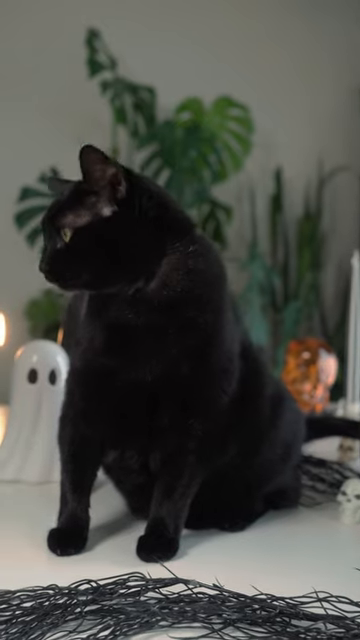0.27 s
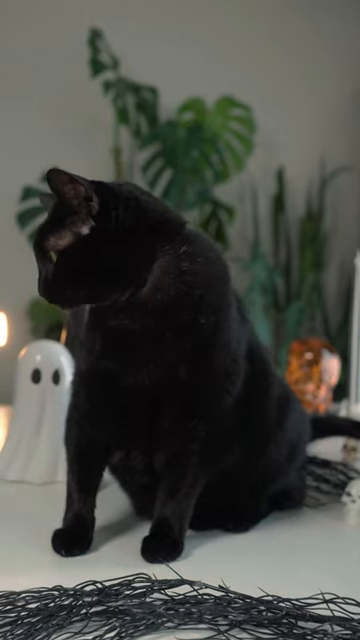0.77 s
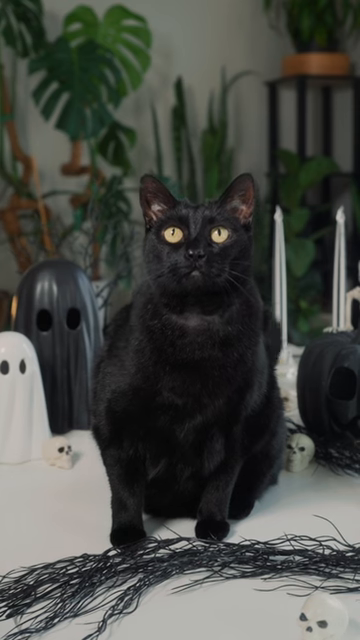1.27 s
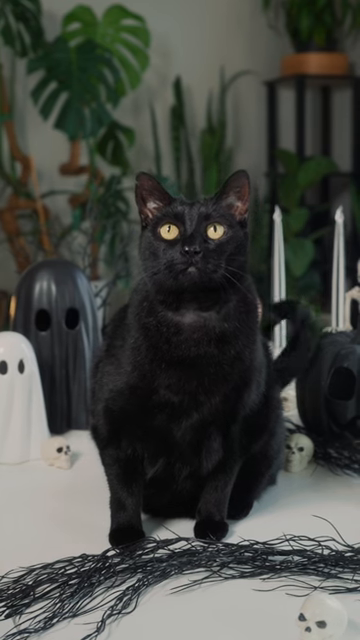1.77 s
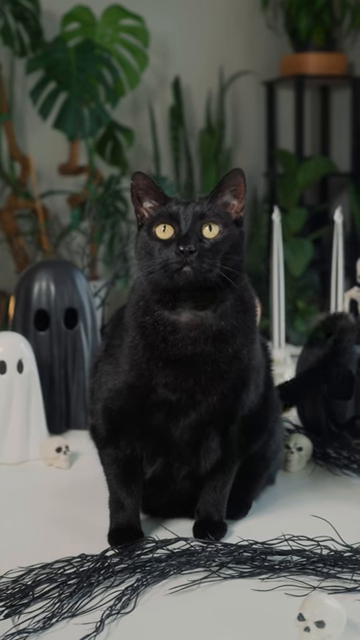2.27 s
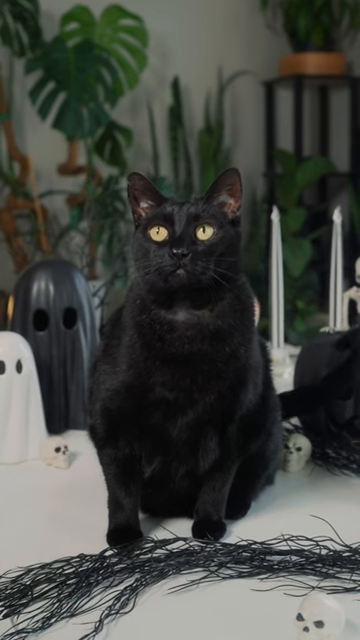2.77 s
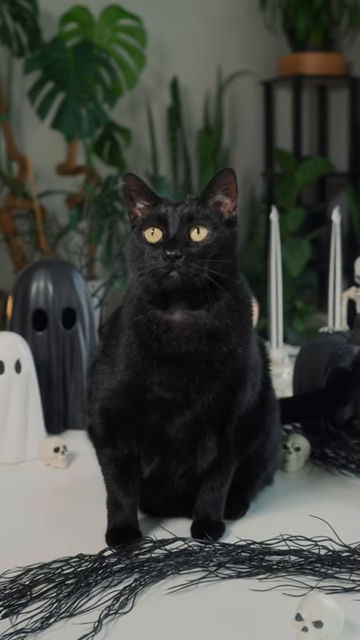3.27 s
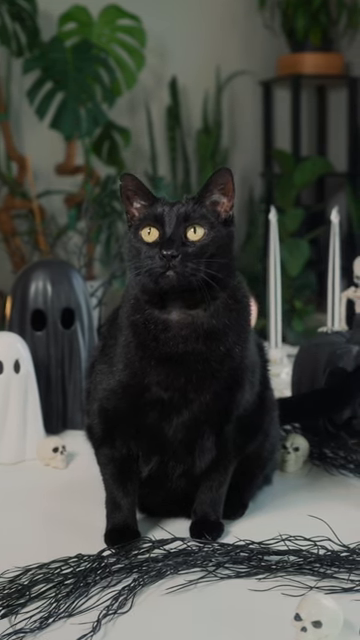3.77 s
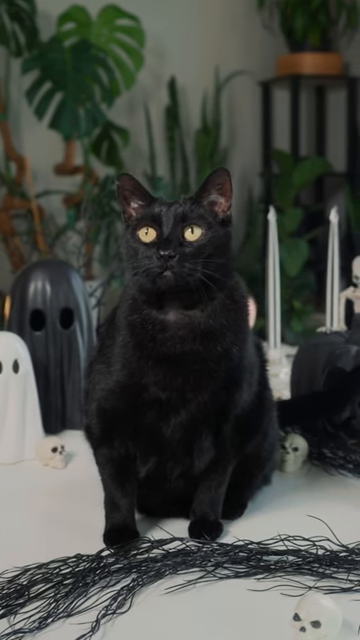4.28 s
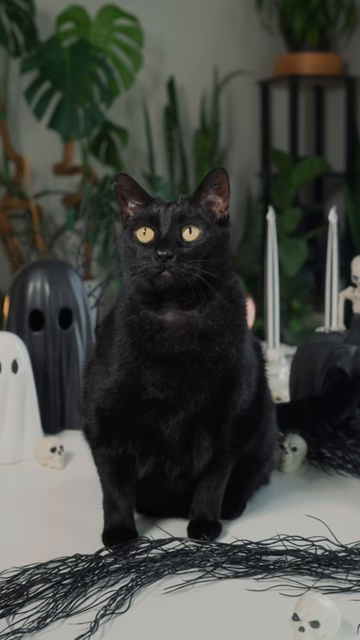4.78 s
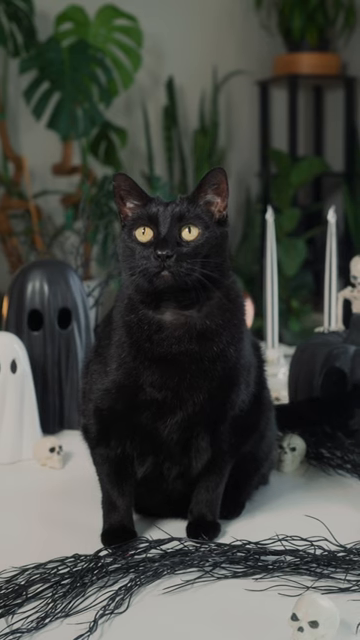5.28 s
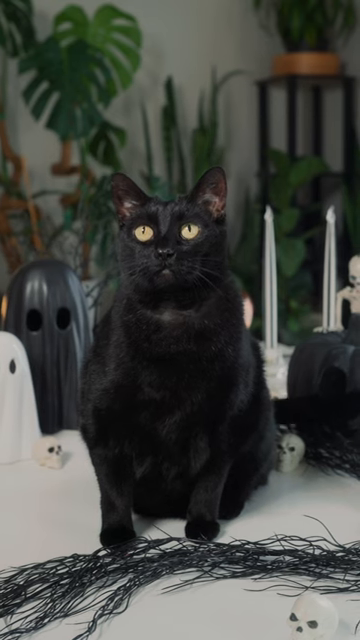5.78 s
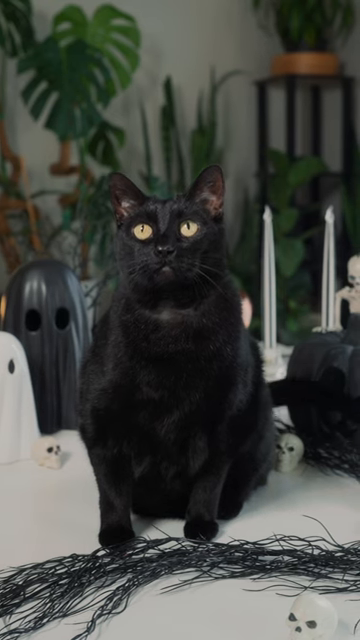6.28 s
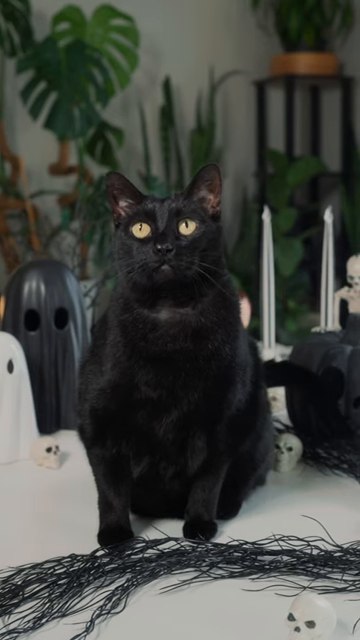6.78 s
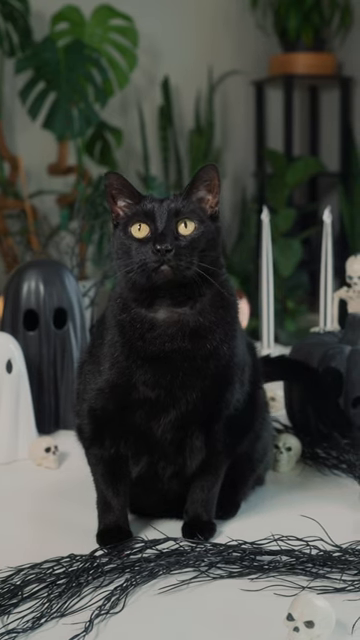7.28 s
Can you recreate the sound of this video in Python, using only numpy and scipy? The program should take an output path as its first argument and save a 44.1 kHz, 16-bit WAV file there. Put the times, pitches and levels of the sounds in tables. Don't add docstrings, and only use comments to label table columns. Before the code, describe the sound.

A sitting cat purrs with the microphone touching its fur, in a quiet room. About 26 low throbs a second, each with a soft knock, a small wet tick and a puff of air. The rumble swells and dips as breath turns every half second, out-breaths and in-breaths differing in colour. Around the third second the fur bumps the microphone with a very deep wobble.

```python
import sys
import numpy as np
from scipy import signal
from scipy.fft import rfft, irfft
from scipy.io import wavfile
from scipy.ndimage import uniform_filter1d

SR = 44100
rng = np.random.default_rng(int(sys.argv[2]) if len(sys.argv) > 2 else 0)


def waveform_to_disk(signal):
    frames = np.transpose(np.atleast_2d(signal))
    scaled = np.clip(frames, -1, 1) * 32767
    samples = np.round(scaled).astype(np.int16)
    wavfile.write(sys.argv[1], SR, samples)


def makeup_ratio(level_db):
    decades = np.asarray(level_db, float) / 20
    return 10 ** decades


N = 332514
T = np.arange(N) / SR
PERIOD_MS = 38.5
CHIN_DROPS_S = 2.05


def set_rms(x, db):
    return x * makeup_ratio(db) / np.sqrt(np.mean(x ** 2))


def bump(ms, rise, fall, roundness=2):
    side = np.where(ms < 0, rise, fall)
    return np.exp(-.5 * np.abs(ms / side) ** roundness)


def clicks(s, size):
    out = np.zeros(N)
    at = np.clip((s * SR).astype(int), 0, N - 1)
    np.add.at(out, at, size)
    return out


def fade(x, ms):
    return signal.lfilter([1], [1, -np.exp(-1000 / (ms * SR))], x)


def band(x, lo_hz, hi_hz):
    return signal.sosfilt(signal.butter(2, (lo_hz, hi_hz), "band", fs=SR, output="sos"), x)


def ring(x, modes):
    total = 0
    for hz, width, db in modes:
        b, a = signal.iirpeak(hz, hz / width, SR)
        total = total + makeup_ratio(db) * signal.lfilter(b, a, signal.lfilter(b, a, x))
    return total


# f/Hz, spectral level/dB
ROOM_SPECTRUM = [(400, -14), (1500, 0), (2600, -6), (8000, -7), (11000, -4.5), (14000, 1), (15800, 2),
                 (16200, -30)]


def room_noise():
    hz, db = np.transpose(ROOM_SPECTRUM)
    bin_hz = np.arange(N // 2 + 1) * SR / N
    colour = makeup_ratio(np.interp(np.log(bin_hz + 1), np.log(hz), db))
    return set_rms(irfft(rfft(rng.standard_normal(N)) * colour, N), -86)


# first twitch t/s, twitches, first gap/ms,
# gap change per twitch/ms
STROKES = [(0.0167, 3, 38.13, 0.0), (0.1312, 12, 38.13, -0.117), (0.5819, 13, 39.55, 0.051),
           (1.0929, 11, 39.3, -0.207), (1.516, 14, 41.92, -0.259), (2.0748, 12, 37.18, -0.006),
           (2.5249, 14, 39.6, 0.022), (3.0765, 11, 37.3, -0.071), (3.4851, 13, 39.82, -0.138),
           (3.9863, 15, 37.38, -0.073), (4.5452, 13, 40.44, -0.172), (5.0505, 12, 37.31, -0.051),
           (5.4992, 14, 40.08, -0.064), (6.0506, 13, 39.46, -0.139), (6.5581, 17, 41.26, -0.081),
           (7.2426, 8, 37.88, -0.016)]


def twitch_times():
    trains = []
    for start, twitches, gap, change in STROKES:
        n = np.arange(twitches)
        trains.append(start + (gap * n + change * n ** 2 / 2) / 1000)
    return np.concatenate(trains)


# out-breath start t/s, in-breath start t/s, larynx slackness (0-1)
BREATHS = [
    (.12, .577, 0),
    (1.066, 1.511, 0),
    (2.06, 2.505, .2),
    (3.05, 3.478, 0),
    (3.96, 4.53, .1),
    (5.03, 5.48, 1),
    (6.05, 6.548, 1),
    (7.23, 8, 1),
]


def breath():
    out, slack = np.zeros(N), np.zeros(N)
    for start, end, loose in BREATHS:
        out[int(start * SR):int(end * SR)] = 1
        slack[int(start * SR):] = loose
    return uniform_filter1d(out, size=700), slack


def place(s):
    turns = np.append(0, np.array(BREATHS)[:, :2])
    k = np.clip(np.searchsorted(turns, s, "right") - 1, 0, len(STROKES) - 1)
    since, until = s - turns[k], turns[k + 1] - s
    return k, since, until, since / (since + until)


def arc(s, rule):
    k, since, until, done = place(s)
    db, sag, start, recover, end, onset = np.array(rule)[1 - k % 2].T
    return db + sag * done + start * np.exp(-since / recover) + end * np.exp(-until / onset)


# level at the turn/dB, swelling to/dB, sag by the end/dB, turbulence/dB
FLOW = [(-11, -16, -4, -64), (-25.5, -8.5, -3, -45), (-13.5, -7.5, -5, -43.5), (-22, -8, -2.5, -43.5),
        (-14.5, -8, -7.5, -43), (-26, -12, -8.5, -51), (-24.5, -15, -10.5, -45), (-32.5, -25, 26, -45),
        (-7, -2.5, -9, -39), (-20, -9, -2, -43.5), (-14.5, -7, -13.5, -44.5), (-29.5, -7, -9, -50.5),
        (-23.5, -15.5, -7.5, -49), (-32.5, -11, -5.5, -52.5), (-23, -17.5, -8, -51),
        (-30.5, -12.5, -3, -51.5)]


def flow_db(s):
    k, since, until, done = place(s + .01)
    turn, top, sag, _ = np.transpose(FLOW)
    swell_s, ebb_s = np.where(k % 2, .058, .091), np.where(k % 2, .045, .061)
    to_next = np.roll(turn, -1) - top - sag
    swell = (turn - top)[k] * np.exp(-since / swell_s)
    ebb = to_next[k] * np.exp(-until / ebb_s)
    return top[k] + sag[k] * done + swell + ebb


def twitch(ms, drift, lead, rise, fall, roundness, brace, closure, edge, hold, recoil, lag, width):
    surge_drift, shut_drift, lag_drift, recoil_drift, _ = drift
    wave = 0
    for v in (ms - PERIOD_MS, ms, ms + PERIOD_MS):
        surge = bump(v + lead + surge_drift, rise, fall, roundness)
        surge -= brace * bump(v + lead + 6 + 1.1 * surge_drift, 1.67, 1.37)
        front = .5 + .5 * np.tanh(v / edge / 2)
        shut = front * bump(np.maximum(v, 0), hold, hold) * makeup_ratio(3.1 * shut_drift)
        back = bump(v - lag + 1.1 * lag_drift, width, width, roundness) * makeup_ratio(1.3 * recoil_drift)
        wave = wave + surge + closure * shut - recoil * back
    return set_rms(wave - wave.mean(), 0)


# surge lead/ms, rise/ms, fall/ms,
# roundness, bracing share, closure share, edge/ms, hold/ms, recoil share, lag/ms, width/ms
TWITCH_OUT_TIGHT = (10.8, 3.3, 2.4, 1.785, 0.022, 0.37, 0.76, 3.2, 0.55, 9.7, 3.42)
TWITCH_OUT_SLACK = (9.5, 3, 3.73, 1.94, 0.24, 0.31, 0.42, 7.2, 1.13, 16.9, 8.95)
TWITCH_IN = (11.49, 1.88, 4.55, 2.13, 0.23, 0.38, 0.46, 3, 0.19, 11.1, 2.8)


def airflow(count, ms, out, slack):
    steps = rng.standard_normal((200, 5)).T
    drift = [np.interp(count, np.arange(200) - 1.5, c) for c in steps]
    tight = twitch(ms, drift, *TWITCH_OUT_TIGHT)
    loose = twitch(ms, drift, *TWITCH_OUT_SLACK)
    outward = (1 - slack) * tight + slack * loose
    inward = -twitch(ms, drift, *TWITCH_IN)
    return makeup_ratio(flow_db(T) + 0.9 * drift[4]) * (out * outward + (1 - out) * inward)


# peak level/dB, sag by the end/dB, crispness/dB
SLAPS = [(-21, -2.5, -16), (-27, 0.5, -15.5), (-27, 1, -12), (-27.5, 3.5, -15.5), (-24, -7, -11),
         (-23.5, -4.5, -13), (-33, 2.5, -12), (-23.5, 14, -19.5), (-17.5, -6, -18.5), (-14, -2.5, -20),
         (-21, -7.5, -15.5), (-21, -1.5, -16.5), (-27, -4.5, -15.5), (-20.5, -2.5, -18),
         (-26.5, -7.5, -14.5), (-23.5, 1, -17.5)]
# t/s, level/dB
ODD_SLAPS = [(.207, 5.5), (.582, 2.5), (.779, 3.5), (1.06, 10.5), (1.724, 4.5), (2.186, 4.5), (2.297, -9),
             (2.334, -10), (2.604, 6), (2.645, 10.5), (3.114, 2), (3.261, -6), (3.371, -9.5), (3.444, -10),
             (3.485, 4.5), (4.023, 6), (4.506, -3.5), (4.247, -2), (5.459, -9), (5.699, 3.5), (6.016, 2),
             (6.053, 2), (6.245, -12.5), (6.515, -18), (6.8, 3), (7.356, 4.5)]
# offset/dB, sag/dB, dip at start/dB, recovery/s,
# dip at end/dB, onset/s
SLAP_ARC = (0, 0.5, -29, 0.041, -41, 0.021), (0, 1, -6.5, 0.095, -23, 0.036)
CRISP_ARC = (0, -3, -2.5, 0.059, 0, .05), (0, -11, -4, .05, 0.0082, .05)


def slap_db(s):
    k, _, _, done = place(s)
    peak, sag, crisp = np.array(SLAPS)[k].T
    odd = sum(db * (np.abs(s - at) < PERIOD_MS / 2000) for at, db in ODD_SLAPS)
    return peak + sag * done + arc(s, SLAP_ARC) + odd, crisp + arc(s, CRISP_ARC)


def thud():
    impulse = band(clicks(np.zeros(1), 1), 190, 560)[:900]
    knock = signal.sosfilt(signal.butter(8, 880, fs=SR, output="sos"), impulse)
    return knock / np.abs(knock).max()


# t/s, peak level/dB, crispness/dB
DOUBLES = [(0.683, -38.5, -6), (1.607, -29, -12.5), (2.158, -28.5, -18), (3.173, -27, -19),
           (3.546, -16.5, -25.5), (3.574, -21, -21.5), (3.647, -24, -25.5), (4.044, -15, -24),
           (4.607, -20, -21.5), (4.639, -28, -19), (4.758, -32.5, -19.5), (5.108, -19.5, -29),
           (6.148, -50, -31), (6.661, -26, -20.5), (6.7, -30, -17), (7.403, -35, -13)]
# f/Hz, width/Hz, level/dB
NOSE = [(3260, 1240, 3), (5250, 2100, 4.5), (7480, 1600, 1), (12100, 1100, -13.5), (13600, 7900, -11.5)]
NOSE_RAISED = [(2870, 690, 4.5), (4280, 460, 1), (4860, 1100, 5.5), (7800, 960, 0), (11900, 1300, -7),
               (14000, 2300, -9)]


def slaps(count, out):
    s = np.interp(np.arange(195), count, T)
    chance = rng.standard_normal((195, 4)).T
    way = np.interp(s, T, 2 * out - 1)
    peak_db, crisp_db = slap_db(s)
    peak_db = peak_db + 1.1 * chance[0]
    s2, peak2_db, crisp2_db = np.transpose(DOUBLES)
    way2 = np.interp(s2, T, 2 * out - 1)
    knock = fade(clicks(s, way * makeup_ratio(peak_db)), 0.67) + fade(clicks(s2, way2 * makeup_ratio(peak2_db)), 1.0)

    early = s - .0145 + .0007 * way + .0007 * chance[1]
    parting_db = flow_db(s) * 4 / 5 + np.where(way > 0, -23, -17) + 2 * chance[3]
    parting = np.convolve(clicks(early, way * makeup_ratio(parting_db)), thud())[:N]

    tick = clicks(s, makeup_ratio(peak_db + crisp_db + 1.3 * chance[2]))
    tick = tick + clicks(s2, makeup_ratio(peak2_db + crisp2_db + 2))
    spray = fade(tick, .6) * rng.standard_normal(N)
    edge = tick + .12 * spray
    nose = np.where(T < CHIN_DROPS_S, ring(edge, NOSE_RAISED), ring(edge, NOSE))
    return makeup_ratio(5.5) * knock, parting + makeup_ratio(14.5) * nose


def tract(x, modes):
    filters = []
    for hz, width in modes:
        roots = np.exp(np.pi * np.array([2j * hz - width, -2j * hz - width]) / SR)
        filters.append(np.real(np.poly(roots)))
    *poles, notch = filters
    x = signal.lfilter(notch / notch.sum(), [1], np.pad(x, (500, 0), "edge"))
    for pole in poles:
        x = signal.lfilter([pole.sum()], pole, x)
    return x[500:]


# f/Hz, width/Hz
THROAT = [(804, 302), (1113, 440), (1160, 6300), (1500, 3200), (1034.6, 115)]
THROAT_RAISED = [(784, 343), (1185, 720), (1660, 1700), (1960, 4500), (977, 140)]


def throat(x):
    return np.where(T < CHIN_DROPS_S, tract(x, THROAT_RAISED), tract(x, THROAT))


# offset/dB, sag/dB,
# dip at start/dB, recovery/s, dip at end/dB, onset/s
THROAT_ARC = (1, -0.5, -25.5, .05, -14, 0.051), (-2.6, -14.5, -12, 0.1, -8, .04)
NOSE_ARC = (-21.5, -3.5, -21, 0.036, -37.5, 0.029), (-23, -19, -15, 0.036, 4.5, .04)
NOSTRIL_ARC = (-27.5, -8.5, -29.5, 0.043, -36, .03), (-36, -16.5, -15.5, .04, -2.5, .04)


def air_db():
    k = place(T)[0]
    air = np.transpose(FLOW)[3][k]
    wet = np.minimum(sum(bump(T - row[0], .02, .02) for row in DOUBLES), 1)
    whistle = 16.5 * (k % 2) * (T < CHIN_DROPS_S)
    levels = air + arc(T, THROAT_ARC), air + arc(T, NOSE_ARC), air + arc(T, NOSTRIL_ARC) + whistle
    wet_db = 5.5, 3.5, 10
    return [uniform_filter1d(db + lift * wet, size=700) for db, lift in zip(levels, wet_db)]


# f/Hz, width/Hz, level/dB
THROAT_AIR_OUT = [(302, 250, 17), (870, 360, 0), (1280, 270, -6.5), (1770, 680, -20.5)]
NOSE_AIR = [(3580, 1000, 5.5), (5560, 850, 6.5), (7730, 1800, 3), (11800, 590, -3), (14000, 2400, -5)]
NOSE_AIR_RAISED = [(2980, 610, 3), (4400, 570, 4.5), (5200, 1000, 6), (7740, 860, 1), (11500, 1500, -5)]
NOSTRILS = [(8400, 1600, 6.5), (11000, 1200, 7.5)]


def hiss(ms, out):
    throat_db, nose_db, nostril_db = air_db()
    flicker = makeup_ratio(3.6 * np.sqrt(90) * uniform_filter1d(rng.standard_normal((3, N)), size=90))
    since = ms % PERIOD_MS
    first, second = bump(since - 8, 16.0, 3.2), bump(since - 22, 6.1, 2.2)
    after = .3 + np.exp(-since / 6)
    noise = rng.standard_normal((3, N))

    inward = set_rms(throat(after * fade(band(noise[0], 130, 1400), 0.94)), 0)
    outward = set_rms(after * ring(noise[0], THROAT_AIR_OUT), 0)
    deep = (out * outward + (1 - out) * inward) * makeup_ratio(throat_db)

    colour = np.where(T < CHIN_DROPS_S, ring(noise[1], NOSE_AIR_RAISED), ring(noise[1], NOSE_AIR))
    nose_puffs = .08 + 0.69 * first + 0.8 * second
    nose = set_rms(nose_puffs * flicker[1] * colour, 1.0) * makeup_ratio(nose_db)

    nostril_puffs = (.13 + .7 * first + second) ** 6.5
    nostrils = set_rms(nostril_puffs * flicker[2] * ring(noise[2], NOSTRILS), 0.87) * makeup_ratio(nostril_db)
    return deep + nose + nostrils


def sinus(x):
    hz, width_hz, share = 2330, 600, .5
    return x - share * signal.lfilter(*signal.iirpeak(hz, hz / width_hz, SR), x)


# t/s, peak level/dB, rise/(dB/s), fall/(dB/s)
NUDGES = [
    (2.82, -9, 55, 31),
    (3.42, -22, 45, 56),
    (4.31, -22, 50, 90),
]


def fur_nudges():
    envelope = 0
    for s, db, rise, fall in NUDGES:
        slope = np.where(T < s, rise, fall)
        envelope = envelope + makeup_ratio(db - slope * np.abs(T - s))
    return np.sqrt(2) * np.cos(2 * np.pi * 10.6 * (T - 2.78)) * envelope


def scene():
    s = twitch_times()
    ends = PERIOD_MS / 1000 * np.array([-1, 1]) + s[[0, -1]]
    count = np.interp(T, np.r_[ends[0], s, ends[1]], np.arange(-1, len(s) + 1))
    ms = (count - np.round(count)) * PERIOD_MS
    out, slack = breath()
    knocks, direct = slaps(count, out)
    voiced = throat(airflow(count, ms, out, slack) + knocks)
    cat = sinus(voiced + direct + hiss(ms, out))
    return (cat + room_noise() + fur_nudges())[None]


def top_cut(x):
    return signal.sosfilt(signal.butter(12, 15990, fs=SR, output="sos"), x)


def record(dry):
    over = np.maximum(np.abs(dry) - .8, 0)
    rounded = dry - np.sign(dry) * (over - .2 * np.tanh(over / .2))
    return top_cut(rounded)


dry = scene()
out = record(dry)
waveform_to_disk(out)
```